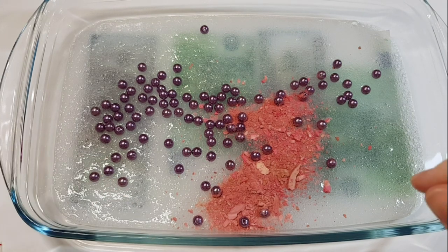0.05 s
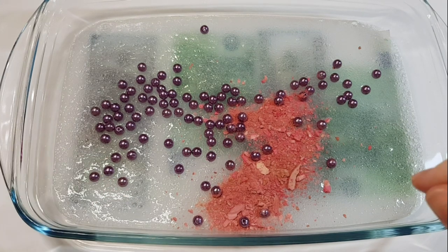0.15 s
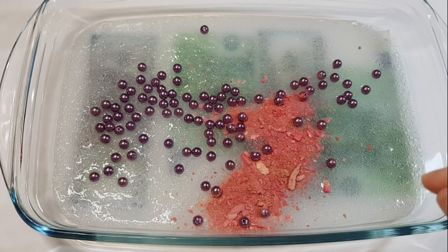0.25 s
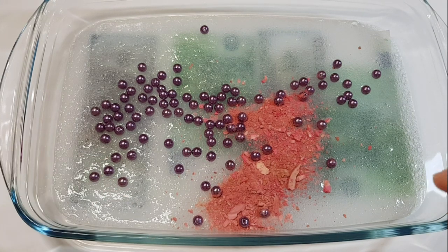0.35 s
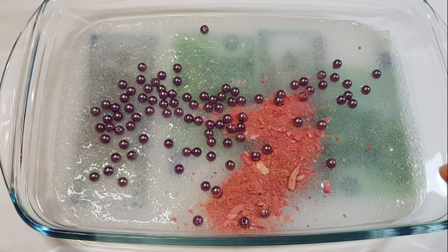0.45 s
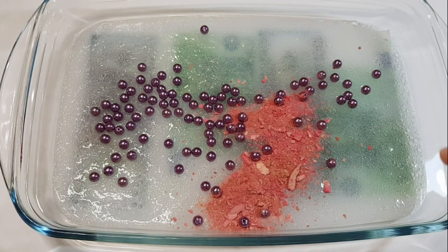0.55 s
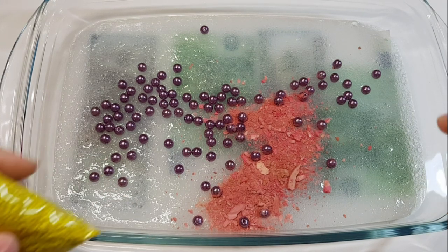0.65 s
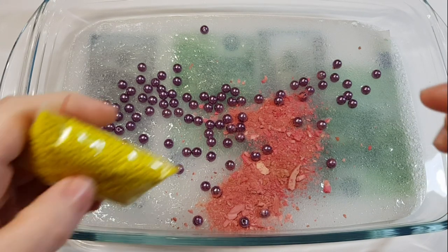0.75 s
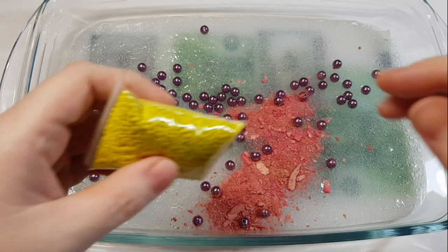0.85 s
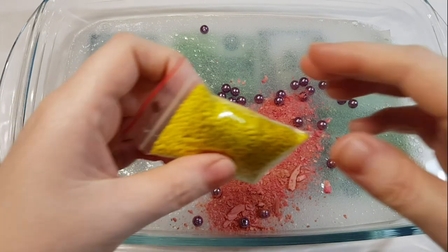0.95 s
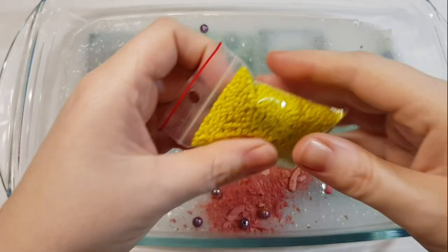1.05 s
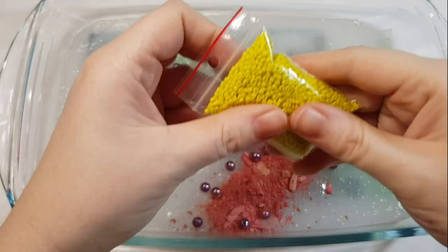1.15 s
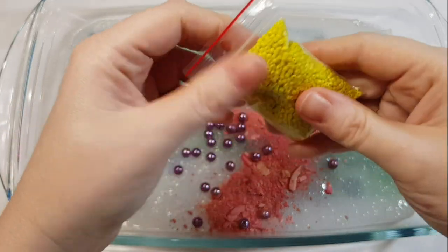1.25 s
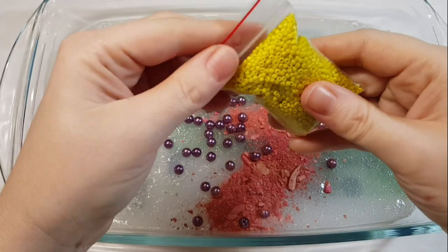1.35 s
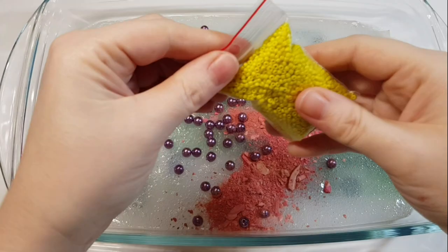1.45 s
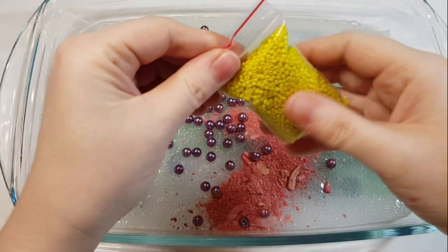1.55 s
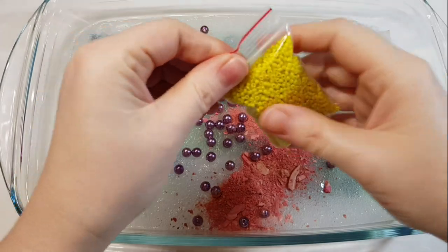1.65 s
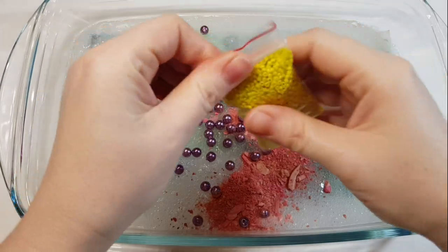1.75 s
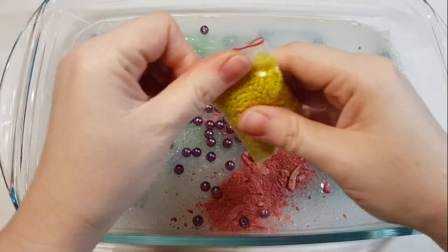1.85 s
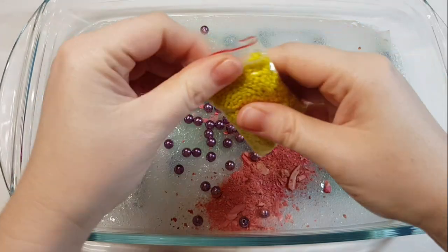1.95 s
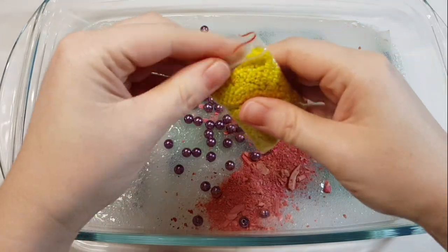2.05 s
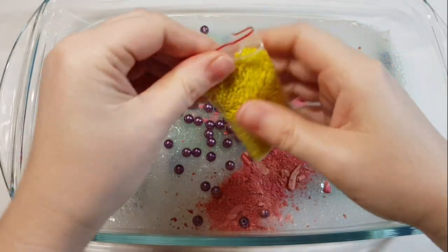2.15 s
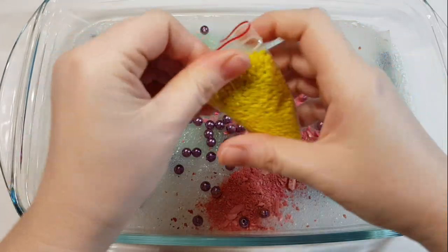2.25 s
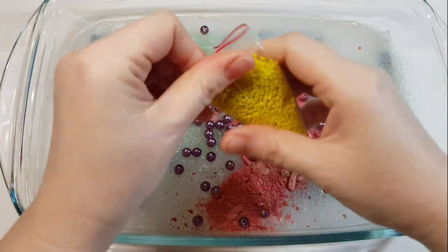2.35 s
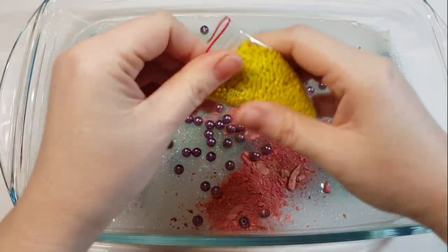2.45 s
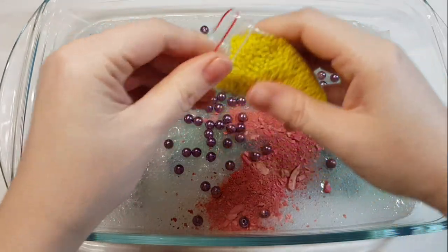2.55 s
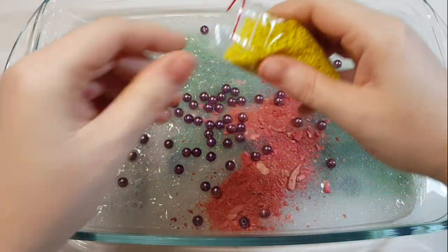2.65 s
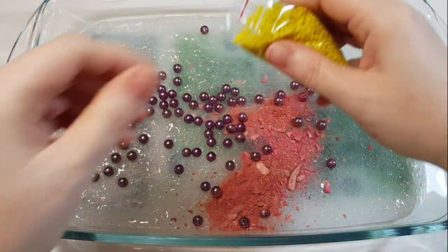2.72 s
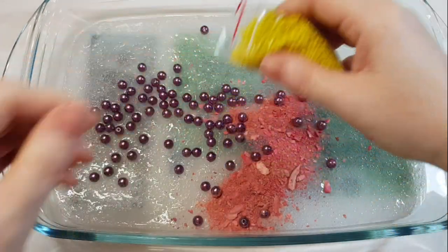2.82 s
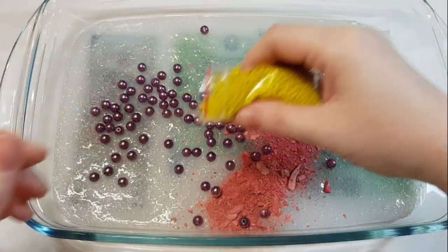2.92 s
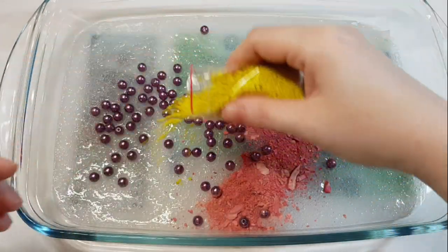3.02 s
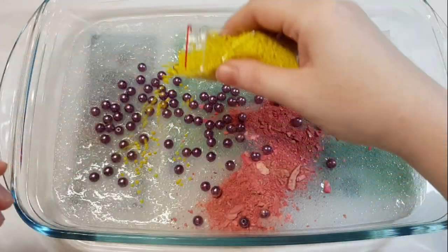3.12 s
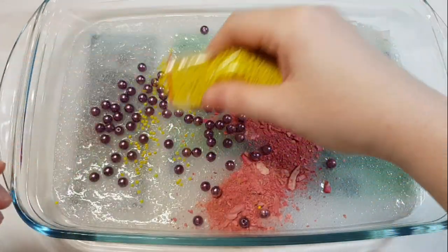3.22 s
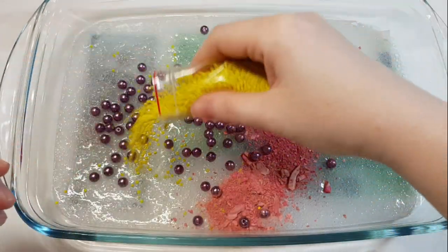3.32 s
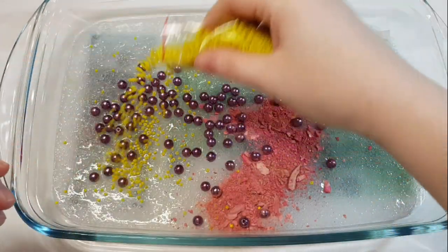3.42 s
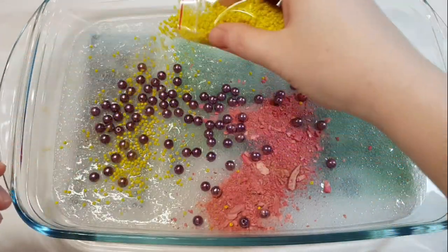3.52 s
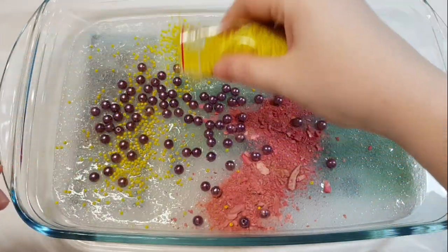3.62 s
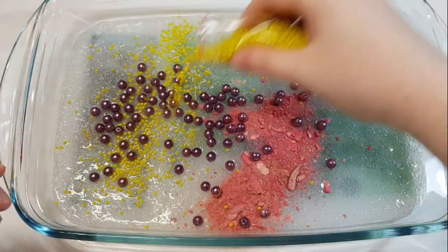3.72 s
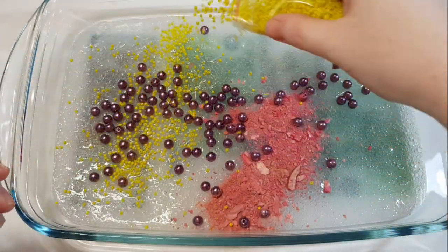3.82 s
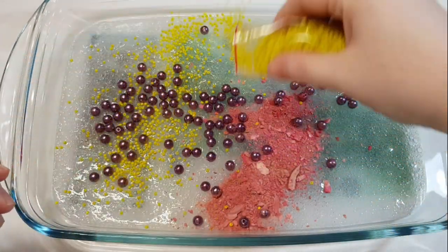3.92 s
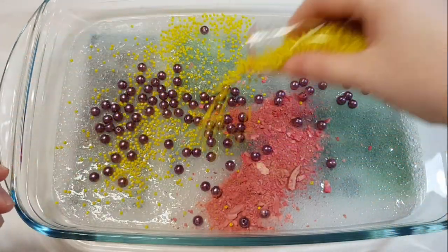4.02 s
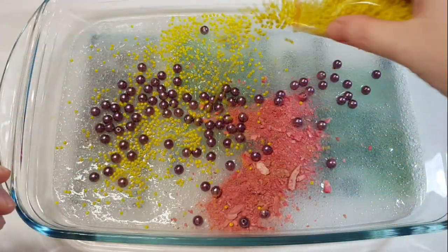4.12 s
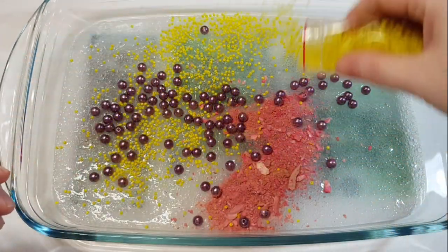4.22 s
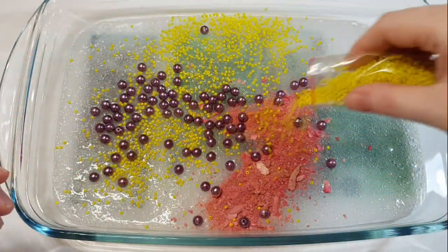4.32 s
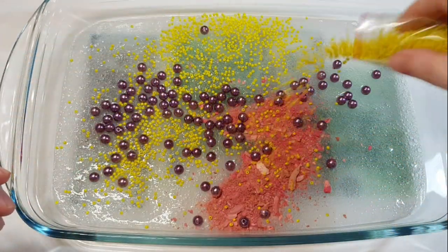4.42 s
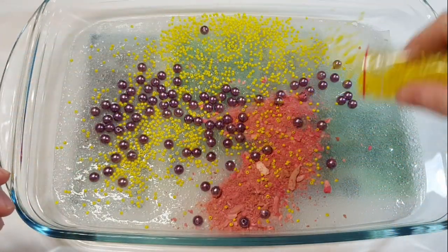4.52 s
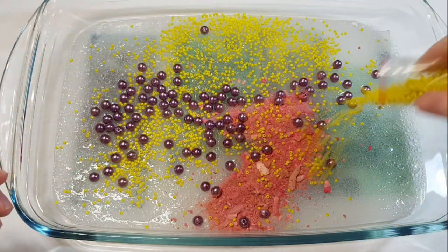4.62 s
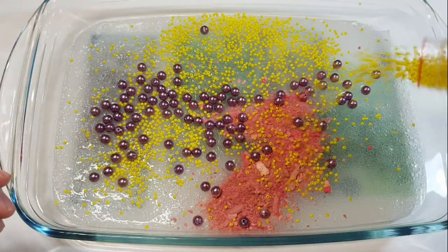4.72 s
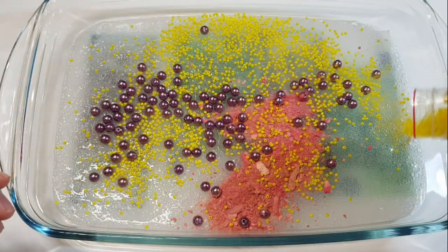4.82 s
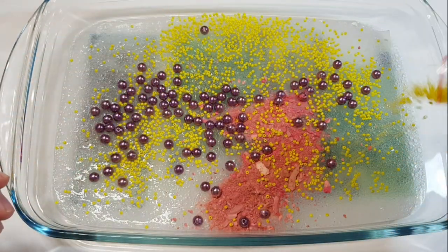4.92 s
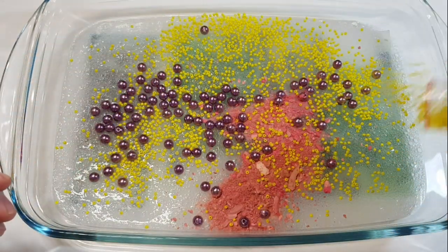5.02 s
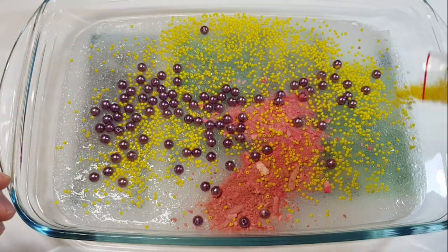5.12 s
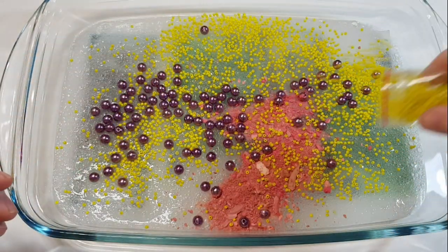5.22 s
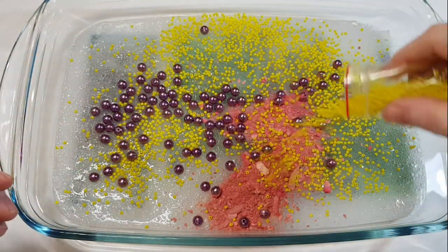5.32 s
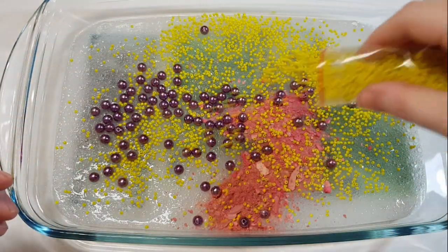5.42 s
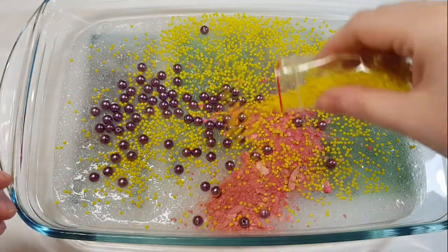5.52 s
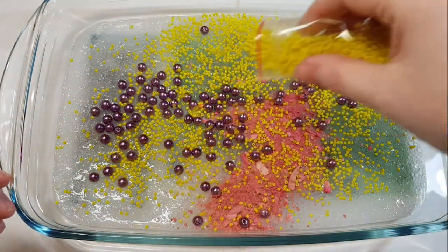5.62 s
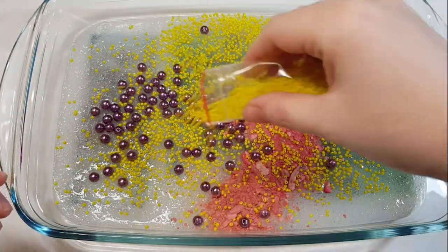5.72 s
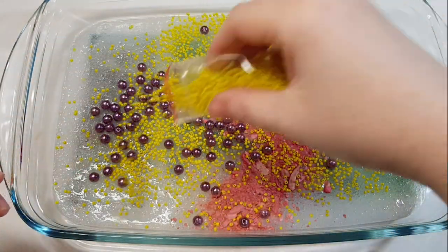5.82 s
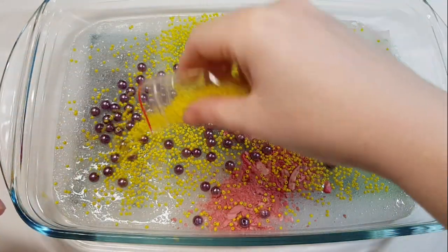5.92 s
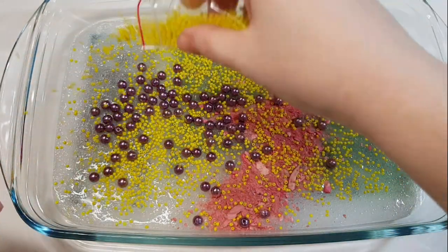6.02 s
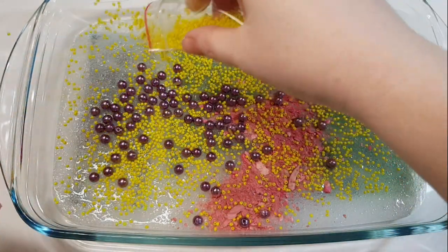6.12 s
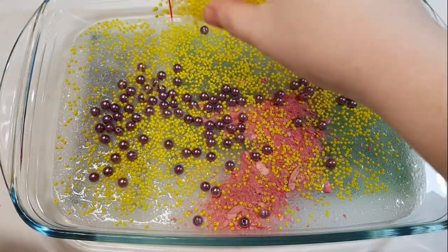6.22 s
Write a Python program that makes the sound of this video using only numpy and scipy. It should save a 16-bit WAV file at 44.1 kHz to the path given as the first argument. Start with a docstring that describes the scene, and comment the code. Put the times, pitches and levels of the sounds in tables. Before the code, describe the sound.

The sound is close and slightly left of centre, in a quiet room with a faint hush. At about 0.2 seconds tiny beads shift in a small plastic bag, and at 0.4 a sharp crackle and a low table bump come as it is lifted. Soft bead ticks and scattered crinkles follow. At 1.8 seconds the loudest snap, with a dull knock, comes as the bag is pinched open, and more snaps and hollow pops run until about 2.9. From 3 seconds the bag is tipped and shaken: the beads pour in a dense, bright spray, ticking against each other, rattling on the plastic and pattering onto slime in a glass dish. The pour swells with each shake, with a faint hollow ring from the bag and soft low bumps underneath. One more sharp crackle comes near 6.2 seconds, as the pouring continues to the end.

```python
"""Soft ticks and a crackle of film come first, as hands lift a small plastic bag of tiny beads off a table.
They pinch it open with sharp snaps, then tip it and shake the beads into a glass dish of slime.
Beads tick on each other, rattle on the film and patter on the slime; the bag's air pocket rings.
Two close microphones in a quiet room hear the bag move about, left of centre. The table and the
microphone stand pick up bumps, and the loudest peaks overload the recorder."""
import sys
import numpy as np
from scipy import signal
from scipy.fft import rfft, irfft
from scipy.io import wavfile
from scipy.ndimage import uniform_filter1d

SR = 44100
rng = np.random.default_rng(int(sys.argv[2]) if len(sys.argv) > 2 else 0)


def store_pcm(level_fs):
    """Save levels as 16-bit WAV."""
    pcm = np.round(np.clip(level_fs, -1, 1) * 32767).astype(np.int16)
    wavfile.write(sys.argv[1], SR, np.atleast_2d(pcm).T)


N = 276066
TIME = np.arange(N) / SR


def gain_of(db):
    """Decibels to gain."""
    return 10 ** (np.asarray(db) / 20)


def unit_rms(x):
    """Scales to rms 1."""
    return x / np.sqrt(np.mean(x ** 2) + 1e-20)


def coloured(x, spectrum):
    """Gives a flat sound the spectrum of a table."""
    hz, db = np.transpose(spectrum)
    bins = np.fft.rfftfreq(N, 1 / SR)
    return irfft(rfft(x) * gain_of(np.interp(np.log(bins + 1), np.log(hz + 1), db)), N)


def resonate(x, hz, width_hz):
    """One resonance of gain 1, fixed or moving."""
    turn = np.exp(2j * np.pi * np.cumsum(hz * np.ones(N)) / SR)
    pole = np.exp(-np.pi * width_hz / SR)
    return 2 * (turn * signal.lfilter([1 - pole], [1, -pole], x / turn)).real


def ringing(noise, modes, widen):
    """Noise drives a set of modes; a second pass, widen times as wide, steepens their skirts."""
    return sum(gain_of(db) * unit_rms(resonate(resonate(noise, hz, width), hz, widen * width))
               for hz, width, db in modes)


def swells(peak_s, swell_s, fade_s, peak_db, swing_db):
    """Gain of events that add in power, each sloping by swing_db per swell or fade time."""
    steps = np.arange(0, N, 64)
    t = steps[:, None] / SR - peak_s
    away = np.hypot(np.where(t < 0, t / swell_s, t / fade_s), 0.24) - 0.24  # rounds the peak
    power = (gain_of(peak_db - swing_db * away) ** 2).sum(axis=1)
    return np.interp(np.arange(N), steps, np.sqrt(power))


# Room tone behind the table: (frequency [Hz], relative density [dB])
HUSH_SPECTRUM = [(24, -34), (40, -21), (69, -67), (109, -53), (219, 21), (326, 11), (538, -4), (595, -39),
                 (823, -27), (932, -18), (7800, -20), (9290, -7), (15700, -6)]
# Faint steady tones, centred between the microphones: (frequency [Hz], width [Hz], level [dB])
ROOM_TONES = [(155.6, 7.3, -79.5), (9254, 73, -75)]


def room_hush():
    """Low room noise, partly shared by the two microphones, with a faint hum and whine."""
    common, separate = rng.standard_normal(N), rng.standard_normal((2, N))
    hush = unit_rms(coloured(separate + 0.4 * common, HUSH_SPECTRUM))
    return gain_of(-60) * hush + ringing(common, ROOM_TONES, widen=1)


# Knocks on the table under the microphones: (time [s], table level [dB], stand level [dB])
TABLE_KNOCKS = [(0.436, -47, -36), (1.806, -21.5, -30)]


def knocks(modes, column):
    """Single blows ring a set of modes, at the levels in one column."""
    out, t = np.zeros(N), np.arange(9000) / SR
    ring = sum(gain_of(db) * np.exp(-np.pi * width * t) * np.sin(2 * np.pi * hz * t)
               for hz, width, db in modes)
    for row in TABLE_KNOCKS:
        out[round(row[0] * SR):][:len(t)] += gain_of(row[column]) * ring
    return out


# Modes of the table top, close by: (frequency [Hz], width [Hz], relative level [dB])
TABLE_MODES = [(251, 26, -5.5), (345, 53, 1.5), (404, 320, 0.5)]
# Modes of the microphone stand: (frequency [Hz], width [Hz], relative level [dB])
STAND_MODES = [(66, 14.4, -2.5), (40, 36, -5.5), (144, 6.7, -6)]
# Handling bumps that travel through the table: (peak time [s], table level [dB], stand level [dB])
HANDLING_BUMPS = [(0.0, -77, -60), (0.192, -39, -46.5), (0.235, -32, -54), (0.278, -33.5, -57),
                  (0.37, -37.5, -62), (0.451, -19, -38), (0.518, -26, -56), (0.565, -37.5, -58),
                  (0.72, -54, -59), (0.95, -62, -54), (1.2, -59, -51), (1.36, -67, -54), (1.58, -88, -52),
                  (1.83, -42, -43), (2.37, -44, -60), (2.65, -39, -57), (3.53, -40, -51), (3.63, -66, -56),
                  (4.079, -43, -55), (4.3, -68, -50), (4.449, -55, -37.5), (4.6, -56, -49.5),
                  (4.8, -77.5, -50), (5.38, -45.5, -49.5), (5.75, -48.5, -57), (6.0, -39, -57),
                  (6.2, -36.5, -62)]


def bumps():
    """The table top rings low, alike on both sides; the stand rumbles, less alike. Both lean left."""
    peak_s, table_db, stand_db = np.transpose(HANDLING_BUMPS)
    top, top_right, foot, foot_right = rng.standard_normal((4, N))
    table = ringing(np.array([top, top + .5 * top_right]), TABLE_MODES, widen=3)
    stand = ringing(np.array([foot, .55 * foot + .75 * foot_right]), STAND_MODES, widen=2)
    table_gain = swells(peak_s, swell_s=0.032, fade_s=0.096, peak_db=table_db, swing_db=28.5)
    stand_gain = swells(peak_s, swell_s=0.073, fade_s=0.21, peak_db=stand_db, swing_db=28.5)
    table = (table_gain + gain_of(-77)) * unit_rms(table) + knocks(TABLE_MODES, column=1)
    stand = (stand_gain + gain_of(-71)) * unit_rms(stand) + knocks(STAND_MODES, column=2)
    return table * gain_of([[1.4], [-1.4]]) + stand * gain_of([[1.6], [-1.6]])


def near_echoes(x, t60_s, changes_per_s):
    """Dish, table and walls throw sparse echoes to each microphone, changing as the hands move."""
    taps = np.zeros((3, 2, 8000))  # three echo patterns to fade between
    delays = np.arange(40, 7980, 20) + rng.integers(0, 20, (3, 2, 397))
    np.put_along_axis(taps, delays, rng.choice([-1., 1.], delays.shape), 2)
    taps *= gain_of(-60 * np.arange(8000) / SR / t60_s)
    shares = np.sqrt(2 / 3) * np.cos(np.pi * (changes_per_s * TIME + np.arange(3)[:, None] / 3))
    echoes = sum(signal.oaconvolve(x * share, tail, axes=1)[:, :N] for share, tail in zip(shares, taps))
    return echoes / np.linalg.norm(taps[0, 0])


# Where the bag is held in front of the microphones: (time [s], left minus right [dB])
BAG_PATH = [(0.15, 6.5), (1.46, 5.5), (1.7, 4), (2.91, 3), (3.64, 4), (4.4, 2.5), (5.07, 1), (5.93, 4.5),
            (6.26, 4)]


def bag_pan_db(time_s):
    """The bag is louder in the nearer, left microphone by this much."""
    return np.interp(time_s, *np.transpose(BAG_PATH))


# Snaps of the film, close to the microphones:
# (time [s], crackle level [dB], crackle centre [Hz], pop level [dB], pop pitch [Hz])
FILM_SNAPS = [(0.168, -22, 12400, -50, 3580), (0.2422, -24, 6350, -48, 2010), (0.37, -21, 11500, -47, 3350),
              (0.433, 0.5, 4000, -9.5, 970), (0.4464, -8, 5770, -16, 1280), (0.4706, -11, 4230, -17, 1150),
              (0.5294, -20, 5050, -18, 730), (0.7241, -12, 8830, -18.5, 2610),
              (0.852, -18, 6400, -49, 2770), (0.893, -18, 11300, -31, 2100), (0.9235, -13, 8980, -25, 2500),
              (1.1725, -16, 12700, -53, 3500), (1.263, -12, 12600, -29, 2200),
              (1.496, -11.5, 9100, -26, 3130), (1.607, -22, 10000, -38, 3080),
              (1.6287, -16.5, 10200, -24.5, 1790), (1.806, 8.5, 10600, -5, 2300),
              (1.9064, -15, 8060, -44, 2290), (2.012, -9, 10100, -43, 1500),
              (2.0271, 0.5, 9500, -8.5, 1370), (2.063, -13, 10500, -37, 1430),
              (2.1261, -25, 11200, -22.5, 1650), (2.206, -7, 11200, -15.5, 1410),
              (2.2164, -0.5, 13100, -21, 1390), (2.2398, -11, 11200, -13, 1270),
              (2.261, -23, 12000, -19, 1310), (2.3237, -26, 3860, -19.5, 1160),
              (2.342, -17, 10600, -24, 1160), (2.3793, 1.5, 14600, -42, 3060),
              (2.505, -27, 9880, -21.5, 2620), (2.5696, -19, 4880, -11, 1980),
              (2.607, -12, 4970, -16, 1100), (2.6339, -17, 9400, -9.5, 1020),
              (2.732, -19, 11200, -31, 2810), (2.782, -14.5, 7490, -49, 2120),
              (2.798, -14, 12900, -33, 2240), (2.8994, -24, 6740, -25, 2520), (2.927, -13, 7790, -35, 2550),
              (6.1575, 0.5, 7750, -45, 1430)]


def film_snaps(t60_s=0.0078, attack_s=0.0008, scatter_db=6):
    """Each snap is a few milliseconds of crackle and a hollow pop of the buckling film."""
    out, t = np.zeros((2, N)), np.arange(2500) / SR
    envelope = gain_of(-60 * t / t60_s) * np.minimum(t / attack_s, 1)
    for time_s, crackle_db, centre_hz, pop_db, pop_hz in FILM_SNAPS:
        noise, waver = rng.standard_normal((2, len(t)))
        band = signal.butter(2, [centre_hz / 3, min(centre_hz * 1.6, 16000)], "band", fs=SR, output="sos")
        crackle = signal.sosfilt(band, noise) * envelope
        pitch_hz = pop_hz * (1 + 1.6 * uniform_filter1d(waver, 30))
        pop = np.sin(2 * np.pi * np.cumsum(pitch_hz) / SR) * envelope
        low_cut = signal.butter(3, pop_hz / 2, "high", fs=SR, output="sos")  # thin film radiates no bass
        pop = signal.sosfilt(low_cut, pop)
        snap = gain_of(crackle_db) * crackle / abs(crackle).max() + gain_of(pop_db) * pop / abs(pop).max()
        pan_db = bag_pan_db(time_s) + scatter_db * np.tanh(noise[-1])  # from all over the bag
        for side, tilt in enumerate((.5, -.5)):
            start = round(time_s * SR) + 3 * side  # the left microphone is a little nearer
            out[side, start:start + len(t)] += (snap * gain_of(tilt * pan_db))[:N - start]
    return out


def at_microphones(clicks, pan_db, lag):
    """Each click reaches the pair with its own level difference and lag on the right, in samples."""
    at = np.flatnonzero(clicks)
    arrival = np.clip(np.round(at + lag[at]).astype(int), 0, N - 1)
    left = clicks * gain_of(pan_db / 2)
    right = np.bincount(arrival, clicks[at] * gain_of(-pan_db[at] / 2), N)
    return np.array([left, right])


def collisions(spectrum, per_s, spread_db, cycles, clump, scatter, pitches):
    """Many small impacts, each ringing for a few cycles, in clumps, spread about the bag."""
    drift = uniform_filter1d(uniform_filter1d(rng.standard_normal(N), 150), 150)
    bunching = np.exp(clump * unit_rms(drift))
    chance, size, position, polarity = rng.random((4, N))
    hits = chance < per_s * bunching / bunching.mean() / SR
    clicks = hits * np.sign(polarity - .5) * gain_of(-spread_db * np.log(size + 0.039))
    bag_db, aside = bag_pan_db(TIME), scatter * (position - .5)
    pan_db = bag_db + .8 * aside
    lag = 3.5 * (bag_db - 2.96) + aside
    pitch_of, out = rng.integers(0, pitches, N), 0
    for k, hz in enumerate(np.linspace(np.sqrt(spectrum[0][0]), np.sqrt(spectrum[-1][0]), pitches) ** 2):
        turns = np.arange(400) / SR * hz
        ring = np.sin(2 * np.pi * turns) * np.exp(-turns / cycles)
        ring *= hz ** 0.7 / np.linalg.norm(ring)  # evens the power per Hz across the pitches
        pair = at_microphones(clicks * (pitch_of == k), pan_db, lag)
        out = out + signal.oaconvolve(pair, ring[None], axes=1)[:, :N]
    return unit_rms(coloured(out, spectrum))


def tipped(start_s=2.964, tilt_s=0.12):
    """Rises from 0 to 1 as the bag tips over the dish."""
    return np.clip((TIME - start_s) / tilt_s, 0, 1)


# Shakes that ring the air inside the bag: (peak time [s], resonance [Hz], relative level [dB])
POCKET_RINGS = [(3.05, 2300, -7), (3.38, 2150, -8.5), (3.78, 2240, -5), (3.89, 2270, -15), (4.08, 2310, -8),
                (4.2, 1470, -9), (4.52, 1540, -3), (4.69, 1620, -2), (5.17, 1650, -6), (5.39, 1480, -7),
                (5.49, 2180, -12.5), (6.0, 1500, -10.5), (6.24, 1620, -3)]


def air_pocket(impacts, harmonic):
    """Impacts ring the air pocket of the tipped bag; its pitch glides from shake to shake."""
    peak_s, hz, db = np.transpose(POCKET_RINGS)
    gain = tipped() * swells(peak_s, swell_s=0.056, fade_s=0.056, peak_db=db, swing_db=10)
    pitch_hz = harmonic * np.interp(TIME, peak_s, hz)
    return gain * unit_rms(resonate(impacts, pitch_hz, width_hz=300 if harmonic == 1 else 350))


# Each shift or shake of the bag in front of the microphones:
# (peak time [s], swell [s], fade [s], tick level [dB], rattle level [dB], patter level [dB])
BAG_SHAKES = [(0.195, 0.025, 0.064, -30, -41, -48), (0.24, 0.043, 0.063, -39, -36, -39.5),
              (0.393, 0.042, 0.047, -29.5, -39, -43), (0.441, .01, 0.058, -18.5, -19, -19),
              (0.501, 0.045, 0.08, -30, -26.5, -22), (0.665, 0.084, 0.061, -33, -40, -47),
              (0.725, .04, 0.047, -27.5, -32.5, -39.5), (0.8, 0.051, 0.032, -39, -43, -44.5),
              (0.9, 0.091, 0.096, -31.5, -38, -45.5), (1.03, 0.079, 0.1, -38.5, -49, -54.5),
              (1.175, 0.042, .1, -31.5, -44, -55), (1.266, 0.09, 0.052, -32.5, -35.5, -45),
              (1.38, 0.066, 0.028, -41, -46, -52.5), (1.5, 0.027, 0.15, -39, -40.5, -56),
              (1.628, 0.019, 0.075, -39.5, -44, -45.5), (1.765, 0.044, 0.053, -33, -37.5, -56),
              (1.816, 0.023, 0.12, -19, -29.5, -31), (2.031, 0.016, 0.076, -23, -42, -27.5),
              (2.241, 0.14, 0.21, -24, -33.5, -32), (2.33, 0.11, 0.14, -28.5, -34, -32.5),
              (2.535, 0.04, 0.052, -24.5, -27.5, -34), (2.646, 0.068, 0.083, -22.5, -29, -23.5),
              (2.78, 0.035, 0.084, -41, -43, -51), (3.022, 0.089, 0.13, -16, -24.5, -26),
              (3.26, 0.12, 0.11, -19, -26.5, -30), (3.36, 0.082, 0.22, -16.5, -22.5, -27),
              (3.54, 0.13, 0.23, -16.5, -24.5, -28.5), (3.781, 0.073, 0.071, -14.5, -23, -22),
              (3.89, 0.16, 0.16, -16.5, -19.5, -22.5), (4.075, 0.084, 0.069, -13.5, -17, -16.5),
              (4.176, 0.12, 0.16, -14, -19, -20), (4.29, 0.037, .06, -15, -47, -45),
              (4.432, 0.13, 0.039, -21, -22, -20.5), (4.531, 0.24, 0.098, -15, -21.5, -22.5),
              (4.67, 0.088, 0.1, -12, -20.5, -21.5), (4.8, 0.12, 0.12, -17.5, -20.5, -24.5),
              (4.94, 0.13, 0.23, -16.5, -20, -22), (5.161, 0.17, 0.1, -16.5, -23.5, -24),
              (5.259, 0.049, .05, -17.5, -20.5, -21.5), (5.369, 0.14, 0.13, -13.5, -20, -19),
              (5.485, 0.064, 0.056, -20, -25, -18.5), (5.584, 0.13, 0.29, -14, -21, -19.5),
              (5.795, 0.11, 0.14, -15, -23.5, -19.5), (5.99, 0.16, 0.19, -14.5, -20, -19.5),
              (6.22, 0.14, 0.13, -15, -23, -23)]


def shaking(layer, swing_db, rest_db, trickle_db, lift_s=0.12):
    """Gain of one bead layer: shakes over a faint stir in the hands and, once tipped, a trickle."""
    peak_s, swell_s, fade_s, *levels_db = np.transpose(BAG_SHAKES)
    lifted = np.clip((TIME - lift_s) / 0.043, 0, 1) ** 2
    shakes = swells(peak_s, swell_s, fade_s, levels_db[layer], swing_db)
    steady = gain_of(rest_db) + tipped() * gain_of(trickle_db)
    return lifted * np.hypot(shakes, steady)


# Beads landing in the dish, close up: (frequency [Hz], relative density [dB])
PATTER_SPECTRUM = [(240, -47), (400, -16.5), (468, -16.5), (875, 0), (972, -2), (1250, 2), (1930, -2),
                   (2280, 1.5), (3200, -5.5), (4160, -6), (7040, -120)]


def slime_patter():
    """Beads land dully on slime and packed beads, and ring the air pocket."""
    patter = collisions(PATTER_SPECTRUM, per_s=5000, spread_db=2.3, cycles=1.3,
                        clump=.3, scatter=8, pitches=12)
    patter += air_pocket(patter, harmonic=1)
    return patter * shaking(layer=2, swing_db=18.5, rest_db=-64, trickle_db=-32)


# Beads on the wall of the bag, close up: (frequency [Hz], relative density [dB])
RATTLE_SPECTRUM = [(1710, -56), (2900, -2.5), (3540, -7), (4450, -2.5), (4950, -5), (6200, -6), (8060, -9),
                   (13600, -120)]


def film_rattle():
    """Beads rattle on the film and ring the overtone of the air pocket."""
    rattle = collisions(RATTLE_SPECTRUM, per_s=6000, spread_db=2.4, cycles=1.6,
                        clump=.3, scatter=6, pitches=8)
    rattle += gain_of(-3.5) * air_pocket(rattle, harmonic=2)
    return rattle * shaking(layer=1, swing_db=15, rest_db=-53, trickle_db=-38.5)


# Bead on bead, close up: (frequency [Hz], relative density [dB])
TICK_SPECTRUM = [(3240, -26), (5500, -13), (8010, -7), (11100, -8), (16000, -15)]


def bead_ticks():
    """Tiny beads strike each other in a dense, bright spray."""
    ticks = collisions(TICK_SPECTRUM, per_s=12000, spread_db=2.2, cycles=2.5,
                       clump=.35, scatter=4, pitches=12)
    ticks *= gain_of([[-1.25], [1.25]])  # the right microphone picks up bright ticks better
    return ticks * shaking(layer=0, swing_db=15, rest_db=-42.5, trickle_db=-26)


def scene():
    """At the microphones: beads and film close up with their echoes, over bumps and room hush."""
    bag = bead_ticks() + film_rattle() + slime_patter() + film_snaps()
    echoes = gain_of(-8) * near_echoes(bag, t60_s=.08, changes_per_s=2.478)
    return gain_of(1.4) * (bag + echoes) + bumps() + room_hush()


def record(dry):
    """The recorder clips at full scale, then cuts the highest treble."""
    clipped = np.clip(dry, -1, 1)
    low_pass = signal.firwin(511, cutoff=15730, window=("kaiser", 9), fs=SR)
    return signal.oaconvolve(clipped, low_pass[None], "same")


dry = scene()
out = record(dry)
store_pcm(out)
```